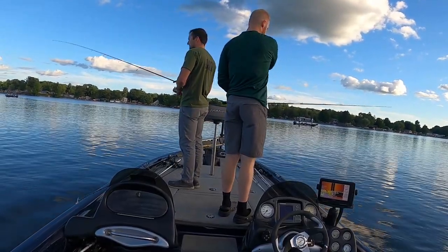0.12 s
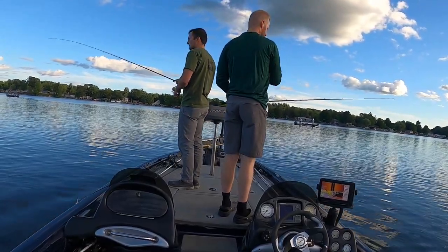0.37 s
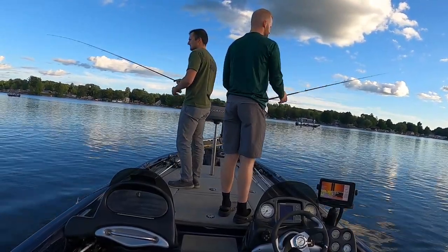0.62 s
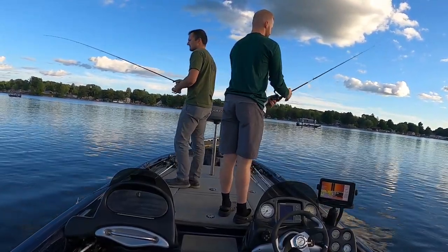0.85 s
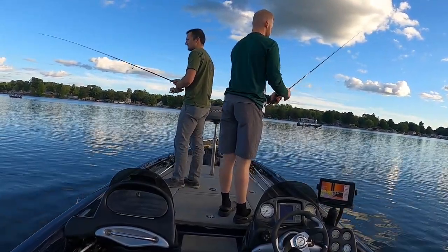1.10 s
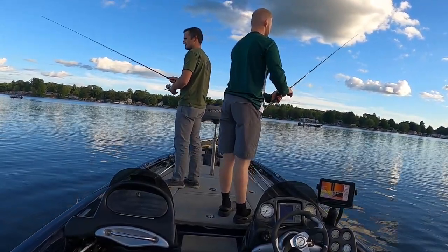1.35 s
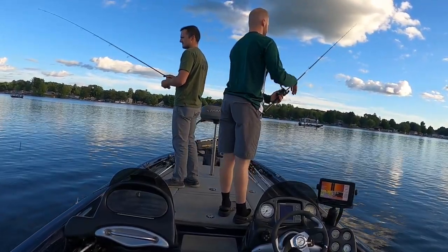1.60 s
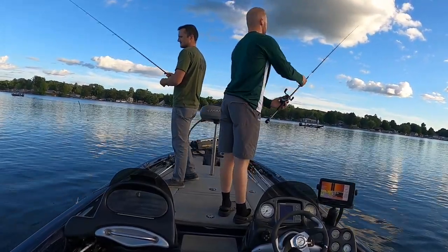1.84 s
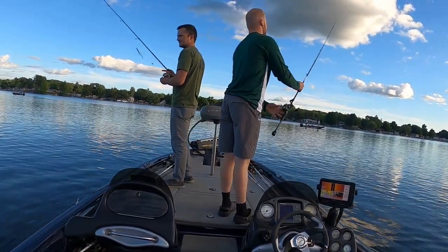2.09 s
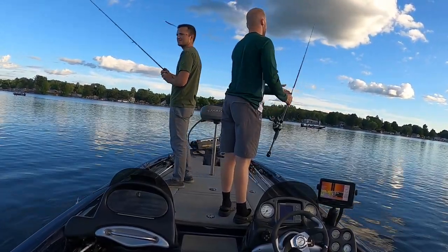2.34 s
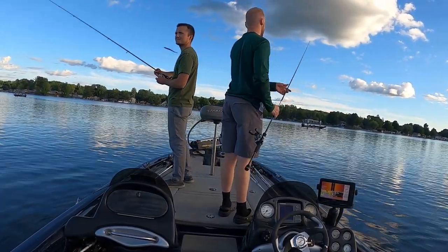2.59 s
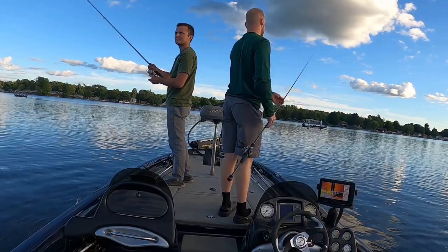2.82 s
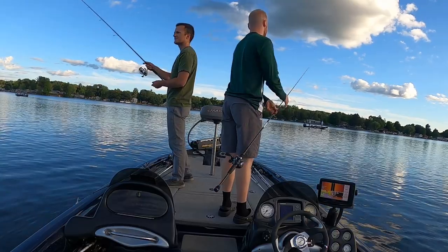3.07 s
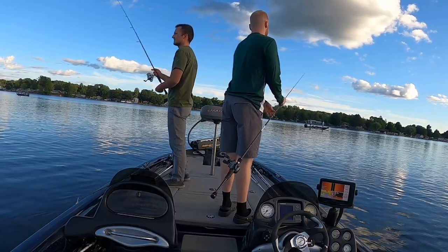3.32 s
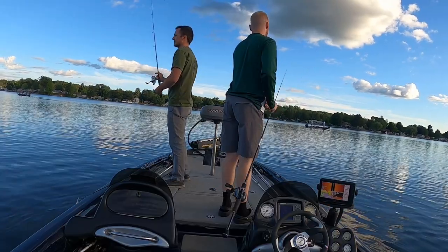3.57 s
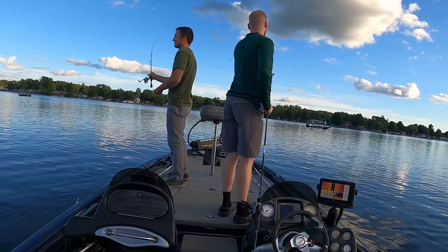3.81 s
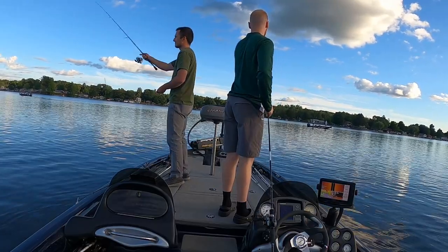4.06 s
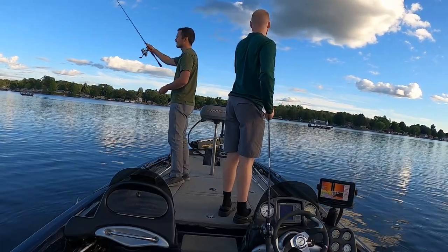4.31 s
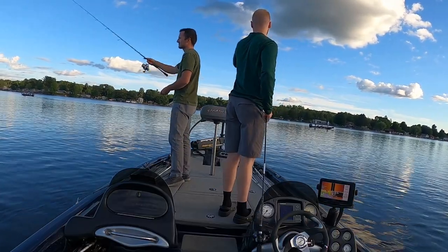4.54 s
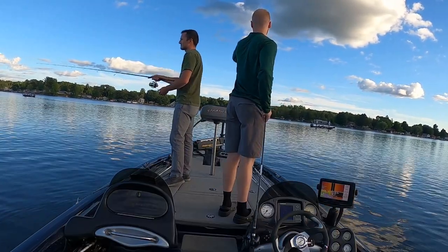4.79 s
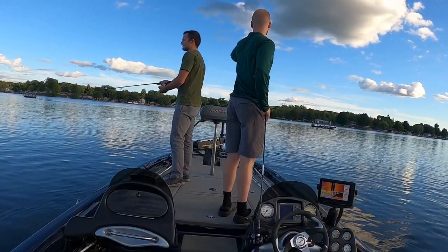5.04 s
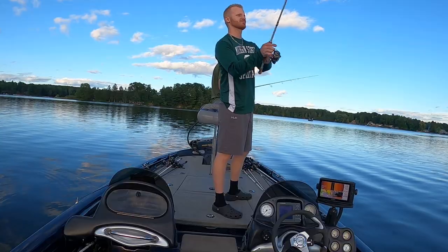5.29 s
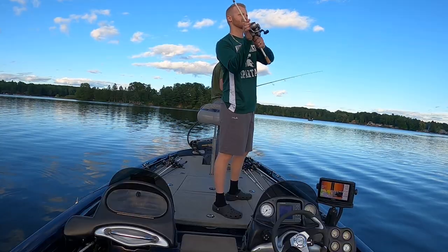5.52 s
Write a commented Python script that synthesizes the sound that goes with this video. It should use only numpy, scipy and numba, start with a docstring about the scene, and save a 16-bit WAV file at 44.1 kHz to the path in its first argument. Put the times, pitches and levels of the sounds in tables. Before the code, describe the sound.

A small stereo camera a few metres away hears anglers handling gear on a boat deck. Sparse dry ticks and two bright snaps come first, with very faint gear whirring between them. Later come a fast airy whoosh, tackle clicks, low hollow thumps and one cracking knock. Soft low rumble and hiss continue throughout, suddenly duller near the end beneath small falling squeaks and a growing swish.

```python
"""Open boat on a calm lake: fishing tackle is handled on deck, a few metres from a small two-port camera.
A reel ticks and snaps as bursts ringing its casing; tackle scrapes in dense slips; gears whir in quick pulses,
about six a second. Rods swish as air noise under a moving edge; reel squeak, winding chirp and singing line
are narrow falling tones; a foot and a rod butt knock the hollow deck into decaying modes. Light wind buffets
the ports in low lumps of noise over a background hush of flickering bands; at 5.2 s a cut to another scene
makes the hush quieter and duller, and it then brightens."""
import sys
import numpy as np
from scipy import signal
from scipy.fft import rfft, irfft, next_fast_len
from scipy.io import wavfile
from scipy.ndimage import uniform_filter1d
from numba import njit

SR = 44100
rng = np.random.default_rng(int(sys.argv[2]) if len(sys.argv) > 2 else 0)


def convert_level_to_amplitude(level_db):
    """Map a level in decibels to its linear amplitude factor."""
    exponent = np.asarray(level_db, float) / 20
    return 10 ** exponent


def output_pcm(signal):
    """Save a mono or channel-first signal as 16-bit PCM at the path in sys.argv[1].

    Samples are clipped to [-1, 1] before scaling.
    """
    pcm = np.clip(np.atleast_2d(signal).T, -1, 1) * 32767
    wavfile.write(sys.argv[1], SR, np.round(pcm).astype(np.int16))


N = 249341
T = np.arange(N) / SR

# ticks and snaps of the tackle: (t/s, peak level/dB, centre f/Hz, width of the ring as a share of f)
TICKS = [(0.993, -36.5, 5700, 2.5), (1.078, -34.5, 5030, 1.6), (1.158, -43, 4100, 0.71),
         (1.171, -42.5, 2430, 0.23), (1.225, -42, 2840, 0.5), (1.279, -37.5, 2720, 0.15),
         (1.334, -42.5, 6000, 0.33), (1.381, -46.5, 3600, 0.3), (1.403, -42, 5150, 0.4),
         (1.568, -22.5, 3930, 0.87), (1.5755, -12, 2330, 0.97), (1.5797, -5, 4080, 1.24),
         (1.59, -21, 1400, 0.73), (1.69, -31.5, 2930, 0.78), (2.433, -43, 2180, 0.87),
         (2.619, -43, 5450, 0.61), (2.724, -38, 2460, 1.5), (2.7714, -29, 1940, 1.9),
         (2.8162, -13, 7500, 1.4), (2.8239, -26.5, 2150, 0.82), (3.681, -48, 3870, 0.31),
         (4.021, -34, 1240, 1.08), (4.3796, -22.5, 2780, 0.95), (4.4213, -27.5, 4420, 0.28),
         (4.47, -25.5, 6500, 0.31), (4.7824, -16, 2700, 1.27), (5.155, -25.5, 2870, 0.81),
         (5.177, -38, 2740, 0.23), (5.265, -40.5, 3400, 1.1), (5.303, -42.5, 2570, 1.3),
         (5.4998, -32.5, 3000, 0.76), (5.584, -32.5, 4000, 0.83)]
# resonances of the reel: (f/Hz, width/Hz, level/dB)
REEL_MODES = [(2150, 46, 2.5), (3670, 280, -13), (5220, 190, -4.5), (7700, 260, -4.5), (9200, 870, -1)]
# tackle dragged or rubbed: (start t/s, length/s, centre f/Hz, level/dB)
SCRAPES = [(3.32, 0.098, 3000, -60), (4.348, 0.062, 2600, -42.5), (4.403, 0.082, 2480, -48.5),
           (5.151, 0.048, 2460, -45)]
# line wound in: (t/s, level/dB)
WINDING = [(2.1, -77), (2.2, -63), (2.6, -60.5), (3.22, -72)]
# resonances that carry the gear noise: (f/Hz, width/Hz, relative level/dB)
GEARS = [(2346, 120, 0.18), (3150, 260, -1.2)]
# rods and line cutting the air: (t of top speed/s, speeding up/s, dying away/s, top f/Hz, relative level/dB)
SWISHES = [(2, 0.047, 0.13, 4340, -37.5), (2.099, 0.13, 0.032, 11670, -51), (3.37, 0.14, 0.17, 8400, -49.5),
           (4.315, 0.17, 0.13, 14500, -37.5), (4.372, 0.11, 0.068, 10400, -36.5),
           (4.48, 0.13, 0.3, 8670, -39.5), (5.62, 0.18, .4, 14500, -35)]
# falling squeaks and chirps, from reel squeak and winding chirp to singing line:
# (start t/s, length/s, first f/Hz, last f/Hz, level/dB)
FALLING_TONES = [(1.419, .07, 2900, 2380, -64), (3.052, 0.12, 3790, 3240, -66.5),
                 (3.689, 0.37, 3850, 3150, -64), (4.194, 0.088, 6140, 5530, -66),
                 (5.454, 0.15, 3840, 3150, -53.5), (5.509, 0.082, 2400, 1596, -56.5),
                 (5.514, 0.185, 3866, 2975, -48), (5.604, 0.099, 2950, 2400, -69)]
# faint tones and wider breaths at one pitch: (start t/s, length/s, f/Hz, width/Hz, level/dB)
LEVEL_TONES = [(0.275, 0.2, 540, 72, -57), (1.71, 0.095, 1845, 17, -62), (2.5, 1.92, 526.5, 24, -68),
               (4.477, 0.11, 4270, 710, -54.5), (4.467, 0.18, 6440, 1600, -51.5),
               (4.922, 0.2, 582, 110, -49.5), (5.199, 0.11, 1147, 71, -58.5)]
# knocks on the deck: (t/s, relative push level/dB, contact/ms, relative crack level/dB)
KNOCKS = [(1.435, -44.5, 0.52, -44), (4.365, -18.5, 4.8, -58), (4.381, -31, 1.1, -53),
          (4.393, -12.5, 11.8, -41.5), (4.415, -13, 13.8, -64), (4.541, -35.5, 8, -64),
          (4.784, -14, 4.4, -33.5), (4.792, -15.5, 3.7, -34.5), (4.8406, -3, 5.4, -7.5),
          (4.893, -18.5, 4.3, -30)]
# modes of the hollow hull: (f/Hz, relative level/dB, t60/s)
HULL_MODES = [(65.04, -19, 0.31), (100.5, -9, 0.26), (144.4, 2, 0.14), (165.3, 2.5, 0.12),
              (269.3, -2, 0.066), (458, 2, 0.058)]
# modes of the deck boards: (f/Hz, relative level/dB, t60/s)
BOARD_MODES = [(540, 3, 0.012), (767, -9.5, 0.055), (989, 3, 0.042), (1199, 0.5, 0.036),
               (1684, -2.5, 0.015), (2010, -18, 0.046)]
# near sound at the left port against the right: (f/Hz, phase lead/radians, level/dB)
PORTS = [(200, 0, 0), (800, -.7, -2.5), (2200, -1, 0), (4500, -1.5, -2), (8000, -1.5, -1),
         (15000, -1.5, -6)]
# gusts on the ports: (t/s, level/dB, length/s)
GUSTS = [(0.594, -38, 0.023), (0.855, -37, 0.011), (2.262, -40, 0.12), (2.578, -37, 0.053),
         (2.753, -34.5, 0.13), (3.556, -38, 0.071), (3.636, -36.5, 0.023)]
# spectrum of lake and breeze: (f/Hz, relative level/dB per Hz)
LAKE = [(15, -43), (25, -10.5), (75, -0.5), (172, -6), (427, -22), (1240, -24.5), (1760, -30.5),
        (2370, -31.5), (3930, -37.5), (7680, -45.5), (15000, -55)]
# likeness of left and right in the background: (f/Hz, correlation 0-1)
LIKENESS = [(60, 1), (300, 0.44), (3100, 0.22), (15000, 0.08)]
# background hush over time; at 5.2 s a cut to another scene makes it quieter and duller:
# (t/s, relative hiss level/dB, brightness/dB per octave)
HUSH = [(0, 4.5, 4), (.4, 4, 1.5), (1.8, 1.5, 1.5), (3.2, 0.5, 0.5), (4, -2.5, 1.5), (5.19, 4.5, 2),
        (5.2, -2.5, -1), (5.65, 3.5, 2.5)]


def curve(rows):
    """Columns of a table as signals in time."""
    s, *columns = np.transpose(rows)
    return [np.interp(T, s, c) for c in columns]


def by_hz(rows, hz):
    """Value of a spectrum at hz, interpolated over log frequency."""
    f, v = np.transpose(rows)
    return np.interp(np.log(hz + 1), np.log(f), v)


def unit(x):
    """Scale to rms 1."""
    return x / np.sqrt(np.mean(x ** 2))


def band(x, hz, width):
    """Fixed resonance, gain 1 at the centre."""
    return signal.lfilter(*signal.iirpeak(hz, hz / width, SR), x)


@njit
def svf(x, hz, width):
    """Moving state-variable filter: band and low outputs."""
    y, low, b, l = np.empty(len(x)), np.empty(len(x)), 0., 0.
    for i in range(len(x)):
        g, k = np.tan(np.pi * hz[i] / SR), width[i] / hz[i]
        v = (b + g * (x[i] - l)) / (1 + g * (g + k))
        low[i] = l + g * v
        b, l, y[i] = 2 * v - b, 2 * low[i] - l, k * v
    return y, low


def walk(rate):
    """Random levels held 1 / rate s and slewed twice; spread near 1."""
    k = int(SR / rate)
    held = np.repeat(rng.standard_normal(N // k + 1), k)
    return 1.22 * uniform_filter1d(uniform_filter1d(held, k), k)[:N]


def add(out, s, x, pan_db=0):
    """Mix x into both channels from time s; pan_db is left minus right."""
    i = int(s * SR)
    x = x[:N - i]
    out[:, i:i + len(x)] += x * convert_level_to_amplitude(np.array([[pan_db], [-pan_db]]) / 2)


def tackle():
    """Each tick is a sharp contact and a dying rattle, ringing the reel around its own pitch."""
    out, t = np.zeros((2, N)), T[:int(SR / 5)]
    contact = np.exp(-t / 0.00052)
    loose_parts = 0.25 * 1000. ** (-t / 0.051)  # rattle on more softly
    fade = (contact + loose_parts) * np.clip(t / 0.00046, 0, 1)
    for s, db, hz, spread in TICKS:
        rattle = rng.standard_normal(len(t)) * fade
        tick = rattle + sum(convert_level_to_amplitude(d) * band(rattle, f, w) for f, w, d in REEL_MODES)
        for _ in range(2):
            tick = band(tick, hz, min(spread * hz, SR / 3))
        add(out, s, convert_level_to_amplitude(db) * tick / np.abs(tick).max())
    return out


def scrapes():
    """Dense slips of uneven size, heard around one broad resonance."""
    out = np.zeros((2, N))
    for start, length, hz, db in SCRAPES:
        chance = rng.standard_normal((int(length * SR), 2))
        slips = chance[:, 0] * convert_level_to_amplitude(7.5 * chance[:, 1])
        scrape = unit(band(band(slips, hz, 1.4 * hz), hz, 1.9 * hz))
        add(out, start, convert_level_to_amplitude(db) * scrape * np.sqrt(np.hanning(len(slips))))
    return out


def winding():
    """Grainy gear noise in the reel's casing, pressing harder once in each turn of the handle."""
    handle_hz, press_s, press_db = 6.2, 2.555, 5.5  # turns a second, a moment of full pressure, swing either way
    lag_s = 0.03  # delay from gear to gear
    teeth = rng.standard_normal(N) * convert_level_to_amplitude(0.73 * walk(120))
    whir = 0
    for k, (hz, width, db) in enumerate(GEARS):
        stroke_db = press_db * np.cos(2 * np.pi * handle_hz * (T - press_s - k * lag_s))
        wander = hz * (1 + 0.035 * walk(18))  # the pitch slides about
        gear = teeth
        for _ in range(2):
            gear = svf(gear, wander, width + 0 * T)[0]
        whir = whir + convert_level_to_amplitude(db + stroke_db + 1.8 * walk(45)) * gear
    turning = (T > WINDING[0][0]) & (T < WINDING[-1][0])
    pan_db = np.array([[2.5], [-2.5]]) / 2
    return unit(whir) * turning * convert_level_to_amplitude(curve(WINDING)[0] + pan_db)


def swish():
    """Grainy air noise; its steep upper edge is the brightest part and climbs with the speed of the rod tip."""
    slow_hz = 5170  # edge as a stroke sets off
    slow_db, gone_db = -13.5, -10  # slow_db counts once at top speed, twice at rest; gone_db is lost by the end
    out = 0
    for s, rise, fall, top_hz, db in SWISHES:
        speed = np.clip(1 + (T - s) / rise, 0, 1)
        spent = np.clip((T - s) / fall, 0, 1)
        hz = np.clip(slow_hz + (top_hz - slow_hz) * speed, 500, 16000)
        grain = convert_level_to_amplitude(2.0 * walk(250) + 3.45 * walk(37))
        air = []
        for _ in range(2):
            x = rng.standard_normal(N) * grain
            bright = svf(svf(x, 0.8 * hz, 0.8 * hz)[0], 0.8 * hz, 0.25 * hz)[0]
            x = 0.5 * x + 1.8 * bright
            for width in (1.4, 1.29, 1.04, 0.73):  # low-passes in a row make the edge steep
                x = svf(x, hz, width * hz)[1]
            air.append(x)
        moving = (speed > 0) & (spent < 1)
        level = convert_level_to_amplitude(db + slow_db * (2.0 - speed) + gone_db * spent)
        out = out + moving * level * (air[0] + 0.6 * air[1] * np.array([[1], [-1]]))
    return out


def note(hz, width):
    """Noise in a band along a pitch line, swelling early and fading."""
    tone = rng.standard_normal(len(hz))
    for _ in range(2):
        tone = svf(tone, hz, width)[0]
    return unit(tone) * np.sqrt(np.sin(np.pi * np.linspace(0, 1, len(hz)) ** 0.7) + 1e-9)


def falling_tones():
    """Squeaks, chirps and singing line on the left: pitch falls fast at first, then settles, wavers and roughens."""
    sink_bend = 2.2  # higher sinks earlier
    tone_width, halo_width, halo_db = 0.029, 0.25, -6.5  # widths as shares of pitch; halo is airy noise
    patchy_db, pan_db = 1, 13.5  # uneven level along the note; left minus right
    out, waver = np.zeros((2, N)), 1 + 0.012 * walk(40)
    for start, length, first_hz, last_hz, db in FALLING_TONES:
        u = np.linspace(0, 1, int(length * SR))
        i = int(start * SR)
        hz = (last_hz + (first_hz - last_hz) * (1 - u) ** sink_bend) * waver[i - len(u):i]
        cry = note(hz, tone_width * hz * (1 + u)) + convert_level_to_amplitude(halo_db) * note(hz, halo_width * hz)
        add(out, start, convert_level_to_amplitude(db) * cry * convert_level_to_amplitude(patchy_db * walk(52.3)[:len(u)]), pan_db)
    return out


def level_tones():
    """Faint tones and wider breaths of filtered noise that stay at one pitch."""
    out = np.zeros((2, N))
    for start, length, hz, width_hz, db in LEVEL_TONES:
        held = np.ones(int(length * SR))
        add(out, start, convert_level_to_amplitude(db) * note(hz * held, width_hz * held))
    return out


def deck():
    """A soft push booms in the hull; the hard edge of the contact cracks on the boards."""
    out, t = np.zeros((2, N)), T[:SR // 2]

    def ring(hz, t60):
        return np.sin(2 * np.pi * hz * t) * 1000. ** (-t / t60)

    # neighbouring modes start in opposite sense
    boards = sum((-1) ** k * convert_level_to_amplitude(db) * ring(hz, t60) for k, (hz, db, t60) in enumerate(BOARD_MODES))
    for s, push_db, contact_ms, crack_db in KNOCKS:
        boom = 0
        for k, (hz, db, t60) in enumerate(HULL_MODES):
            # a long, heavy contact moves the whole hull: more of the modes below 140 Hz
            weight = (contact_ms / 7.0) ** (3.0 * max(np.log2(140 / hz), 0))
            boom = boom + (-1) ** (k + 1) * convert_level_to_amplitude(db) * weight * ring(hz, t60)
        push = np.hanning(int(contact_ms * SR / 1000) + 3)
        add(out, s, convert_level_to_amplitude(push_db) * signal.fftconvolve(boom, push / push.sum()), 1.1)
        grit = rng.standard_normal(len(t)) * (np.exp(-t / 0.00031) + 0.4 * 1000. ** (-t / 0.068))
        grit[0] = 5.33  # a strong first touch
        crack = signal.fftconvolve(boards, grit)[:len(t)]
        splinter = band(band(grit, 1530, 1750), 2000, 2600)
        hard = crack / np.abs(crack).max() + 1.38 * splinter / np.abs(splinter).max()
        add(out, s, convert_level_to_amplitude(crack_db) * hard)
    return out


def at_ports(near):
    """Near sounds reach the left port late and, over most of the range, shaded."""
    n = next_fast_len(N)
    hz, ports = np.fft.rfftfreq(n, 1 / SR), np.array(PORTS)
    lead, shade_db = by_hz(ports[:, :2], hz), by_hz(ports[:, [0, 2]], hz)
    near[0] = irfft(rfft(near[0], n) * convert_level_to_amplitude(shade_db) * np.exp(1j * lead), n)[:N]
    return near


def wind():
    """Each gust is a short lump of low eddy noise on the ports, mostly alike left and right."""
    eddies = [unit(band(band(rng.standard_normal(N), 53.0, 38.5), 51.5, 31)) for _ in range(2)]
    lumps = sum(convert_level_to_amplitude(db) * np.exp(-(2 * (T - s) / length) ** 2) for s, db, length in GUSTS)
    return lumps * (eddies[0] + 0.24 * eddies[1] * np.array([[1], [-1]]))


def background():
    """Third-octave bands that flicker alone; above the bass the hush changes in level and brightness."""
    level_db, bass_flicker_db, hiss_flicker_db = -47.5, 3.2, 1.2  # overall rms; flicker of each band
    hiss_db, tilt_db = curve(HUSH)
    out = 0
    for hz in 25 * 2 ** np.arange(0, 9.3, 1 / 3):
        mid, side = (unit(band(band(rng.standard_normal(N), hz, hz / 3), hz, hz / 3)) for _ in range(2))
        like = np.clip(by_hz(LIKENESS, hz), 0, 1)
        share = np.clip(np.log2(hz / 300), 0, 1)  # 0 in the bass, 1 in the hiss from 600 Hz up
        hush_db = share * (hiss_db + tilt_db * np.log2(hz / 2500))
        flicker_db = (bass_flicker_db + share * (hiss_flicker_db - bass_flicker_db)) * walk(9)
        db = by_hz(LAKE, hz) + 10 * np.log10(hz) + hush_db + flicker_db
        stereo = np.sqrt(1 + like) * mid + np.sqrt(1 - like) * side * np.array([[1], [-1]])
        out = out + convert_level_to_amplitude(db) * stereo
    return convert_level_to_amplitude(level_db) * unit(out)


def scene():
    """Near sounds pass the port differences; wind and background are added as they are."""
    near = tackle() + scrapes() + winding() + swish() + falling_tones() + level_tones() + deck()
    return at_ports(near) + wind() + background()


def roll_off(x):
    """The treble ends steeply here."""
    return signal.sosfilt(signal.butter(12, 16470, fs=SR, output="sos"), x)


def record(dry):
    """The microphones lose treble in a step above 8 kHz and fade out at the very top."""
    low = signal.sosfiltfilt(signal.butter(14, 8100, fs=SR, output="sos"), dry)
    heard = low + convert_level_to_amplitude(-6) * (dry - low)
    heard = signal.sosfilt(signal.butter(4, 14200, fs=SR, output="sos"), heard)
    return roll_off(heard)


dry = scene()
out = record(dry)
output_pcm(out)
```